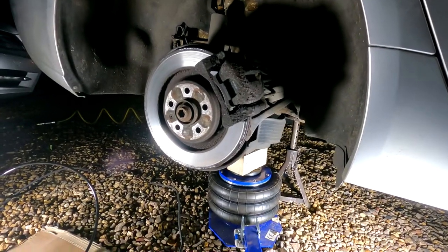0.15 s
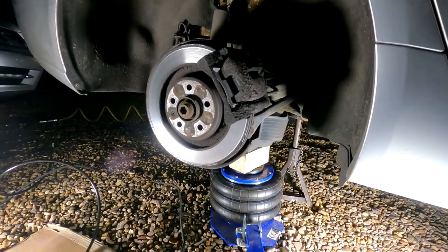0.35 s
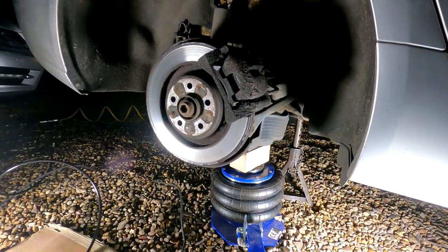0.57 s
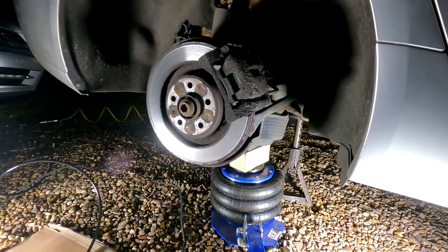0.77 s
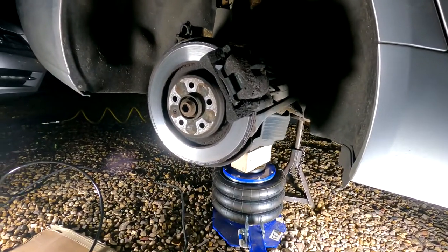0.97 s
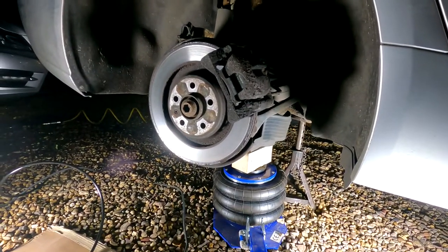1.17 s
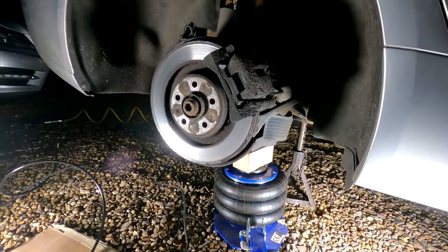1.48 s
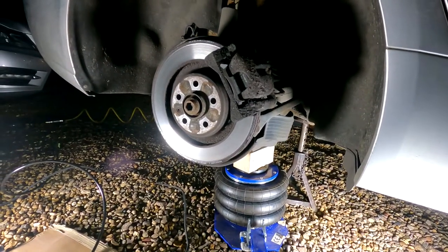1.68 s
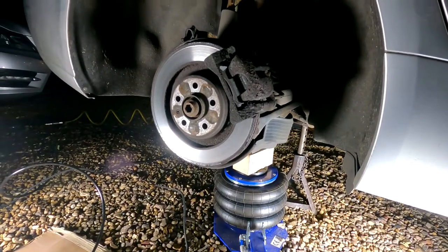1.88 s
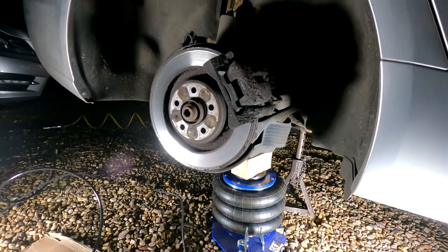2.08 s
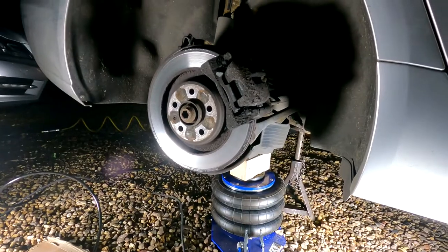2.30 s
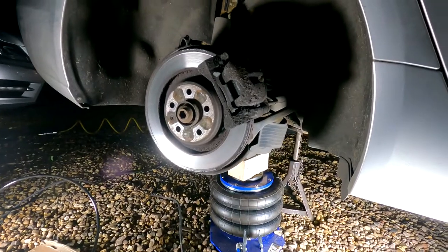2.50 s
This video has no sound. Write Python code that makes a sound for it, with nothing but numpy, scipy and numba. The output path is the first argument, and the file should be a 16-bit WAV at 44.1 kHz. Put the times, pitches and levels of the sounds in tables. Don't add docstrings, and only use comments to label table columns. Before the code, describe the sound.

Compressed air rushes continuously into a rubber jack on gravel, ringing metallic and slightly rising in pitch; dry clicks dot it, a block knocks late on, and wind buffets the camera microphones, with one strong pop.

```python
import sys
import numpy as np
from scipy import signal
from scipy.fft import rfft, irfft
from scipy.io import wavfile
from scipy.ndimage import uniform_filter1d
from numba import njit

SR = 44100
rng = np.random.default_rng(int(sys.argv[2]) if len(sys.argv) > 2 else 0)


def decibels_to_gain(level_db):
    exponent = np.asarray(level_db, float) / 20
    return 10 ** exponent


def log_audio(samples):
    frames = np.atleast_2d(samples).T
    limited = np.clip(frames, -1, 1)
    pcm = np.round(limited * 32767).astype(np.int16)
    wavfile.write(sys.argv[1], SR, pcm)


N = 116865
T60 = np.log(1000)

# start_s, flow_db, bag_pressure (0-1), lift (0-1)
FLOW = [
    (0, 0.5, 0, 0.1),
    (.3, 0, 0.13, 0.4),
    (.75, 0, 0.55, 0.5),
    (1.2, -0.5, 0.67, 0.68),
    (1.5, 0, 0.66, 0.95),
    (2.0, -1.5, 0.76, 0.86),
    (2.65, -1.5, 0.97, 1.),
]


def level(x, db):
    return x * decibels_to_gain(db) / np.sqrt(np.mean(x ** 2))


@njit
def svf(x, hz, width):
    y, b, l = np.empty(len(x)), 0., 0.
    for i in range(len(x)):
        g, k = np.tan(np.pi * hz[i] / SR), width / hz[i]
        v = (b + g * (x[i] - l)) / (1 + g * (g + k))
        b, l, y[i] = 2 * v - b, l + 2 * g * v, k * v
    return y


def band(x, hz, width):
    return svf(x, np.clip(hz + np.zeros(len(x)), 10, .45 * SR), 1. * width)


def low_pass(x, order, hz):
    return signal.sosfilt(signal.butter(order, hz, fs=SR, output="sos"), x)


def walk(rate):
    hold = int(SR / rate)
    steps = np.repeat(rng.standard_normal(N // hold + 1), hold)
    return 0.54 * uniform_filter1d(uniform_filter1d(steps, hold), hold)[:N]


def curve(table, column):
    return np.interp(np.arange(N) / SR, np.array(table)[:, 0], np.array(table)[:, column])


def pair(make, side_db):
    return make() + decibels_to_gain(side_db) * make() * np.array([[1], [-1]])


def left_gain(db):
    return decibels_to_gain(np.array([[db], [0]]))


def add(out, s, sound):
    i = int(s * SR)
    out[..., i:i + sound.shape[-1]] += sound[..., :N - i]


def wind():
    # start_s, length_s, level_db, pitch_hz
    gusts = [(-.03, 0.15, -35.5, 70), (0.022, 0.1, -44, 188), (0.071, 0.11, -34.5, 94),
             (0.176, 0.2, -35, 89.5), (0.373, 0.11, -48.5, 145), (.38, 0.093, -51, 70),
             (0.49, 0.081, -51, 66), (0.55, .1, -51.5, 152), (0.697, 0.083, -46, 79),
             (0.835, 0.096, -53, 137), (0.846, 0.12, -48.5, 76), (1.1, 0.15, -48, 44.7),
             (1.807, .08, -46, 101), (2.065, 0.076, -40.5, 129), (2.297, 0.16, -50, 64),
             (0.955, 0.13, -43.5, 112), (1.21, 0.087, -40.5, 162), (1.223, 0.081, -41, 55),
             (1.362, 0.099, -36, 64), (1.389, 0.1, -43, 201), (1.637, 0.1, -33, 160),
             (1.759, 0.146, -42, 58.5), (1.749, 0.091, -44, 202), (1.89, 0.17, -36, 125.5),
             (1.95, 0.072, -30.5, 65.4), (0.238, 0.061, -43, 253), (2.121, 0.12, -38, 70),
             (2.224, 0.22, -47.5, 160), (2.477, 0.13, -33.5, 129), (2.51, 0.13, -41, 56),
             (2.527, 0.048, -38, 215), (2.595, 0.096, -34.5, 89)]
    calm = (-1, 5, -47, 70)
    edge_s, rel_width, side_db, buffet_db, pan_db = 0.049, 0.89, -46, 3.5, -1
    t, out = np.arange(N) / SR, 0
    for s, length, db, hz in [calm] + gusts:

        def rumble():
            narrow = band(rng.standard_normal(N), hz, rel_width * hz)
            return band(band(narrow, hz, 1.1 * hz), hz, 1.66 * hz)

        inside_s = np.minimum(t - s, s + length - t)
        shape = np.clip(inside_s / edge_s + .5, 0, 1) ** 2
        gust = shape * pair(rumble, side_db) * decibels_to_gain(buffet_db * walk(13))
        out = out + gust * decibels_to_gain(db) / np.sqrt(np.mean(gust ** 2) / np.mean(shape ** 2))
    return out * decibels_to_gain(np.array([[pan_db], [-pan_db]]) / 2)


def pops():
    # start_s, level_db, snap_db, left_right_db
    events = [
        (1.5407, -7.5, -16.5, -5.5),
        (2.3186, -25.5, -39, -4),
    ]
    kick_s, kick_left_db, left_lead_s = .0024, -14, .0004
    suck_s, suck_width_s, back_s, back_db = .0031, .0013, .003, -7
    snap_hz, snap_t60_s = 5530, 0.0028
    out, t = np.zeros((2, N)), np.arange(int(.06 * SR)) / SR
    kick = -np.cos(2 * np.pi * t / kick_s) * np.exp(-(1.5 * t / kick_s) ** 2)
    late = t + np.array([[left_lead_s], [0]])
    back = np.maximum(late - 1.5 * suck_s, 0) / back_s
    recovery = decibels_to_gain(back_db) * back * np.exp(1 - back)
    suck = recovery - np.exp(-((late - suck_s) / suck_width_s) ** 2)
    snap = -np.sin(2 * np.pi * snap_hz * t) * np.exp(-T60 * t / snap_t60_s)
    for s, db, snap_db, pan_db in events:
        push = suck * left_gain(pan_db) + kick * left_gain(kick_left_db)
        add(out, s, low_pass(decibels_to_gain(db) * push + decibels_to_gain(snap_db) * snap, 2, 9000))
    return out


def crunch():
    # start_s, grain_db, pitch_hz
    shift = [
        (1.7, -79, 1800),
        (1.713, -36, 1750),
        (1.734, -30, 1730),
        (1.747, -27.5, 860),
        (1.76, -33.5, 875),
        (1.772, -39.5, 900),
        (1.779, -34, 1070),
        (1.8, -42, 736),
        (1.85, -66, 600),
    ]
    grains_per_s, scatter_db = 5000, 1.5
    hz, db = curve(shift, column=2), curve(shift, column=1)

    def gravel():
        hits = (rng.random(N) < grains_per_s / SR) * rng.standard_normal(N)
        grains = hits * decibels_to_gain(scatter_db * rng.exponential(size=N))
        return band(band(grains, hz, 1160), hz, 3900)

    return decibels_to_gain(db) * level(pair(gravel, -17.0), -0.95) * (db > -57)


def ticks():
    # start_s, body_db, body_hz, t60_s, click_db
    events = [(.176, -23, 1500, 0.04, -39), (.39, -33, 1600, .04, -45), (0.249, -19.5, 1137, 0.12, -49),
              (0.248, -22, 640, 0.074, -50), (0.512, -20, 1500, 0.027, -29.5),
              (.622, -19, 1360, 0.019, -28), (0.941, -39, 1400, .03, -46), (.71, -24, 1600, .03, -43),
              (1.055, -19, 1550, 0.033, -27), (1.189, -22, 1060, 0.056, -48.5), (1.19, -27, 1650, .04, -50),
              (1.328, -19, 1520, 0.019, -38), (1.4002, -7.5, 1000, 0.008, -23),
              (1.4035, -16, 1200, 0.014, -40), (1.4225, -23, 2500, .01, -25), (1.426, -29, 2700, .01, -30),
              (1.441, -15.5, 1520, 0.034, -32), (1.645, -27, 1500, 0.049, -40),
              (1.663, -19, 1400, .03, -45), (1.676, -21, 1180, 0.033, -45), (1.662, -23, 3800, 0.018, -33),
              (1.6755, -10, 3050, 0.011, -44), (1.695, -14, 3170, .01, -29),
              (1.7544, -24, 1000, 0.018, -44), (1.778, -25, 1300, .03, -38), (1.792, -35, 700, 0.025, -50),
              (1.885, -21, 3270, 0.018, -40), (1.892, -30, 3200, .02, -27),
              (1.9145, -16.5, 1570, 0.067, -35), (2.009, -19, 1590, .03, -35), (2.027, -46, 1490, .02, -33),
              (2.17, -24, 3450, 0.022, -37), (2.611, -17, 1050, 0.04, -46)]
    # pitch_ratio, level_db
    body_modes = [(0.62, -11), (1.0, 0), (1.42, -8), (2.25, -8)]
    click_hz, click_width_hz, click_t60_s = 4200, 5500, 0.012
    snap_off, grit, scrape_share = 8, .4, .8
    out, t = np.zeros((2, N)), np.arange(int(.1 * SR)) / SR

    def gritty_click():
        noise = rng.standard_normal(len(t)) * np.exp(-T60 * t / click_t60_s)
        return band(band(noise, click_hz, click_width_hz), click_hz, click_width_hz)

    for s, body_db, hz, t60, click_db in events:
        scrape = grit * rng.standard_normal(len(t)) * np.exp(-T60 * t / (scrape_share * t60))
        scrape = scrape + snap_off * (t == 0)
        body = 0
        for ratio, db in body_modes:
            body = body + decibels_to_gain(db) * band(scrape, hz * ratio, 6 * ratio / max(t60, .005))
        click = low_pass(pair(gritty_click, -24), 3, 9500)
        body = decibels_to_gain(body_db) / 2 * body / np.abs(body).max()
        add(out, s, body + decibels_to_gain(click_db) * click / np.abs(click).max())
    return out


def knock():
    # pitch_hz, level_db, t60_s
    block = [(160, -8, 0.037), (245, 1.5, 0.029), (311, 0.5, 0.055), (527, 0.5, 0.031), (745, -2.5, 0.034),
             (1036, -3, 0.058), (1300, -3.5, 0.038), (1580, 9, 0.019), (2000, -3, 0.017), (2895, 4.5, 0.01),
             (4090, 1.5, 0.0081)]
    # delay_s, level_db
    bounces = [
        (.0085, -12),
        (0.014, -13.5),
        (.0035, -18),
    ]
    knock_s, knock_db, crack_db, crack_t60_s = 1.7366, -8, -23, 0.039
    out, t = np.zeros((2, N)), np.arange(int(.15 * SR)) / SR
    for after, hit_db in [(0.000088, 0.0044)] + bounces:
        ring = 0
        for k, (hz, db, t60) in enumerate(block):
            scatter_db, detune = rng.standard_normal(2)
            sign = 1 if hz < 600 or k % 2 else -1
            tone = np.sin(2 * np.pi * hz * (1 + .03 * detune) * t)
            ring = ring + sign * decibels_to_gain(db + scatter_db) * tone * np.exp(-T60 * t / t60)
        crack = pair(lambda: band(rng.standard_normal(len(t)), 6900, 7000), -10)
        crack = crack * np.exp(-T60 * t / crack_t60_s)
        add(out, knock_s + after, decibels_to_gain(hit_db) * (decibels_to_gain(knock_db - 12.5) * ring + decibels_to_gain(crack_db) * crack))
    return out


def jet():
    # pitch_hz, density_db (per Hz)
    spectrum = np.array([(200, 0.5), (450, -11.5), (1710, -12.5), (2210, -8), (3590, -8.5), (8800, -11),
                         (12400, -11), (14900, -32)])
    out = 0
    for hz in 200 * 2 ** np.arange(0, 6.2, 1 / 3):
        db = np.interp(np.log(hz), np.log(spectrum[:, 0]), spectrum[:, 1]) + 0.3 * walk(24.6)
        rush = pair(lambda: band(band(rng.standard_normal(N), hz, hz / 3), hz, hz / 2), -17 + hz / 900)
        out = out + decibels_to_gain(db) * rush
    return level(out, -47.5)


def ringing(modes, shift_db=(), rise_hz=()):
    flutter_db, drift, side_db = 1.2, .002, -14
    pressure, lift = curve(FLOW, column=2), curve(FLOW, column=3)
    out = 0
    for k, (hz, width, db) in enumerate(modes):
        shift = shift_db[k] if k < len(shift_db) else 0
        rise = rise_hz[k] if k < len(rise_hz) else 0
        gain = decibels_to_gain(db + flutter_db * walk(5.92) + shift * pressure)
        home = hz + rise * lift
        centre = home * (1 + drift * walk(3))

        def mode():
            return band(band(rng.standard_normal(N), centre, 0.92 * width), home, 6 * width)

        out = out + gain * pair(mode, side_db)
    return out


def hose():
    # pitch_hz, width_hz, level_db
    modes = [(9060, 60, -1), (9800, 53, -1.5), (10230, 76, 1), (10640, 120, -4), (11850, 280, -3.5)]
    return level(ringing(modes), -57)


def valve():
    # pitch_hz, width_hz, level_db
    modes = [(4310, 35, -12), (4525, 30, -14), (4720, 45, -14), (4960, 34, -8), (5155, 70, -8),
             (5430, 32, -14), (5818, 43, -9), (6315, 45, -6), (6450, 120, -5), (6600, 110, -6),
             (6957, 30, 1), (7195, 40, -5), (7325, 40, -5), (7450, 50, -10)]
    return level(ringing(modes), -42)


def steel_base():
    # pitch_hz, width_hz, level_db
    modes = [(718.5, 44, -11.5), (851.5, 36, -15.5), (1005, 107, -18.5), (1336, 56, -13.5),
             (1500, 85, -16.5), (1944, 70, 2.5), (2044, 26.4, -13.5), (2193, 44, -2.5), (2340, 150, -14.5),
             (2526, 53, -1.5), (2850, 50, -12.5), (3312, 48, -17), (3857, 25, -15.5), (4156, 67, -12.5)]
    # change_db at full pressure, mode by mode
    shift_db = [-7.5, -7, -2.5, 2.5, -1.5, -9, 15.5, 7.5, 0, -12]
    # rise_hz at full lift, mode by mode
    rise_hz = [3, -4, 2, 15.5, 8, 50, 21.5, 40.5, 13, 95, 112]
    return level(ringing(modes, shift_db, rise_hz), -39)


def ports(x):
    # pitch_hz, left_over_right_db
    balance = [(60, 1), (110, 1), (200, 2), (370, 7), (690, 1), (1260, 1), (2320, -1.5), (4270, -0.5),
               (7850, 2), (14400, -3)]
    # pitch_hz, left_lead_rad
    lead = [(0, -0.2), (600, -0.45), (2840, -0.62), (5510, -0.46), (7150, -0.35), (9470, 0.4), (12100, 0),
            (14000, 0.8)]
    hz = np.fft.rfftfreq(N, 1 / SR)
    half_gain = decibels_to_gain(np.interp(hz, *np.array(balance).T) / 2)
    half = half_gain * np.exp(.5j * np.interp(hz, *np.array(lead).T))
    return irfft(rfft(x) * np.array([half, 1 / half]), N)


def scene():
    air = decibels_to_gain(curve(FLOW, column=1)) * (steel_base() + valve() + hose() + jet())
    jack = air + ticks() + crunch() + knock()
    return ports(jack) + wind() + pops()


def top_cut(x):
    return signal.sosfilt(signal.butter(12, 15040, fs=SR, output="sos"), x)


def record(dry):
    mix = signal.sosfilt(signal.butter(1, 15, "high", fs=SR, output="sos"), dry)
    mix = low_pass(mix, 10, 13400)
    return top_cut(mix)


dry = scene()
out = record(dry)
log_audio(out)
```